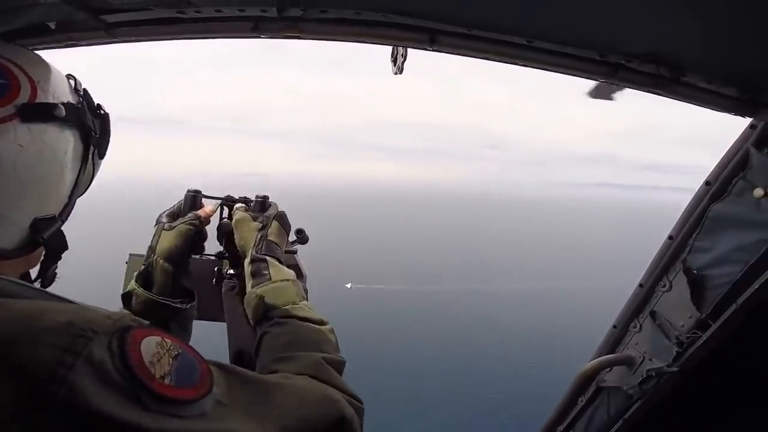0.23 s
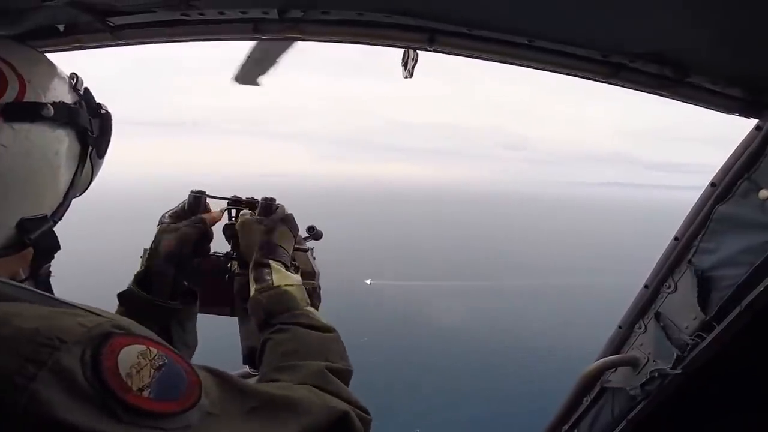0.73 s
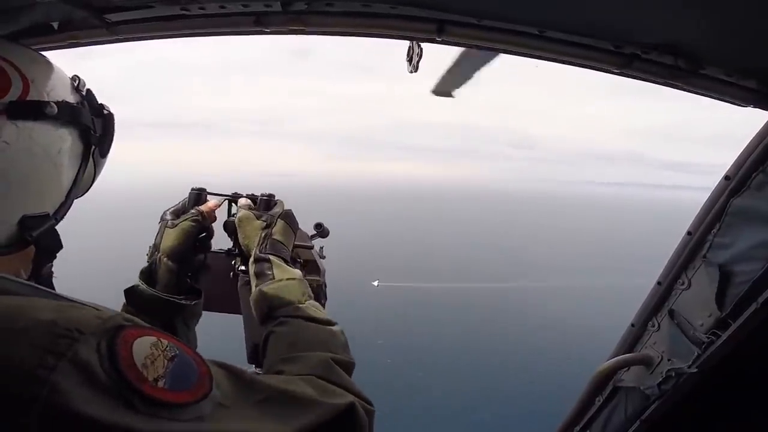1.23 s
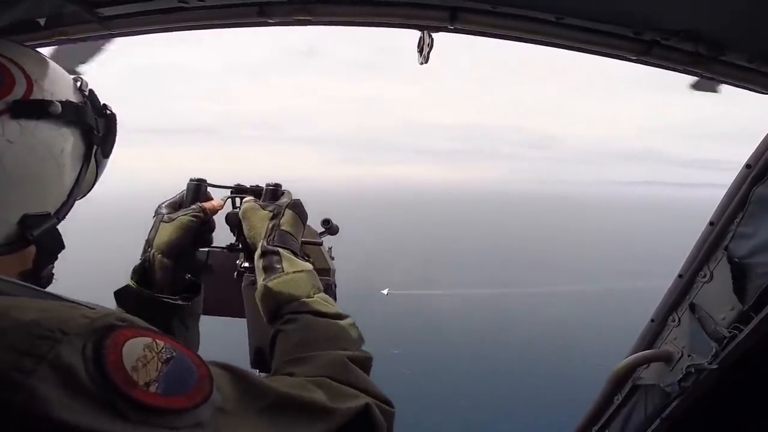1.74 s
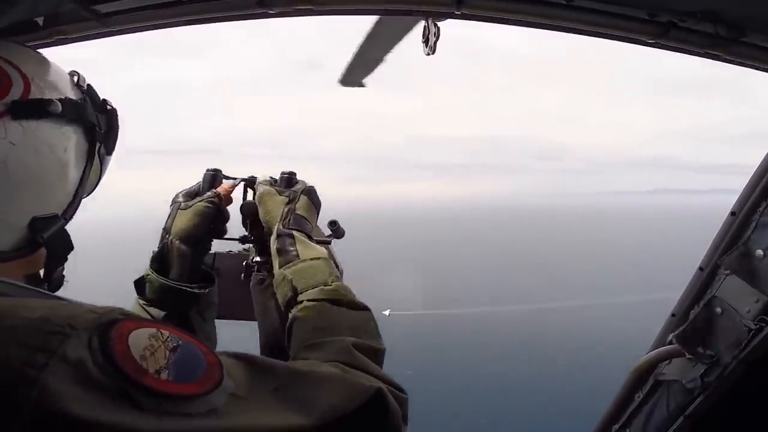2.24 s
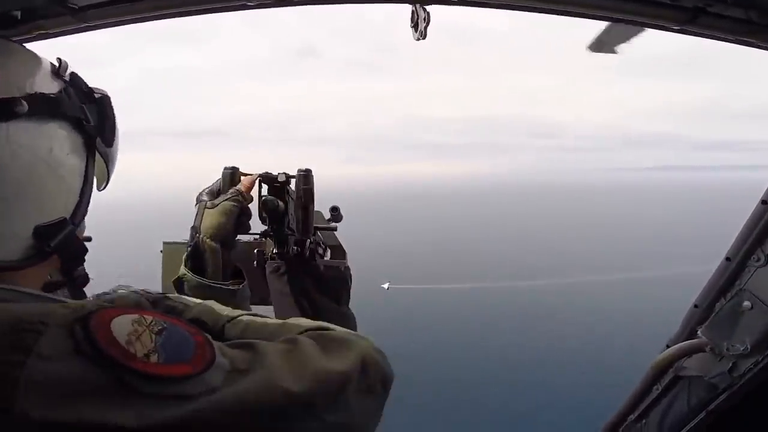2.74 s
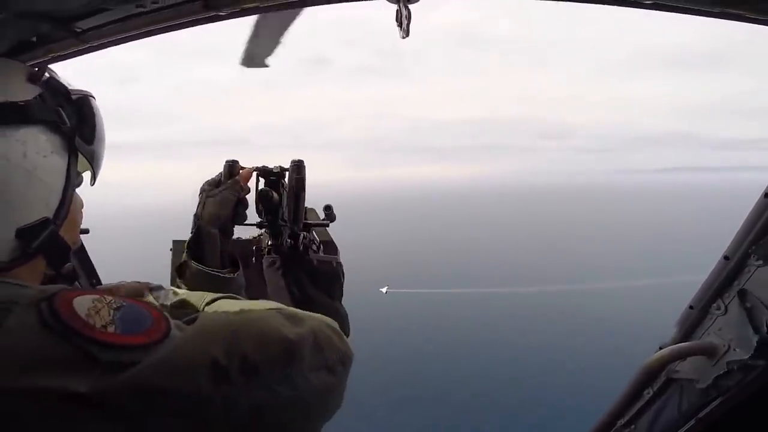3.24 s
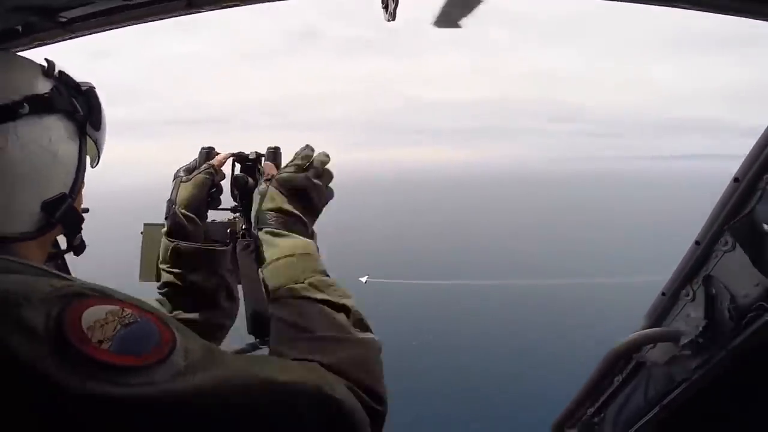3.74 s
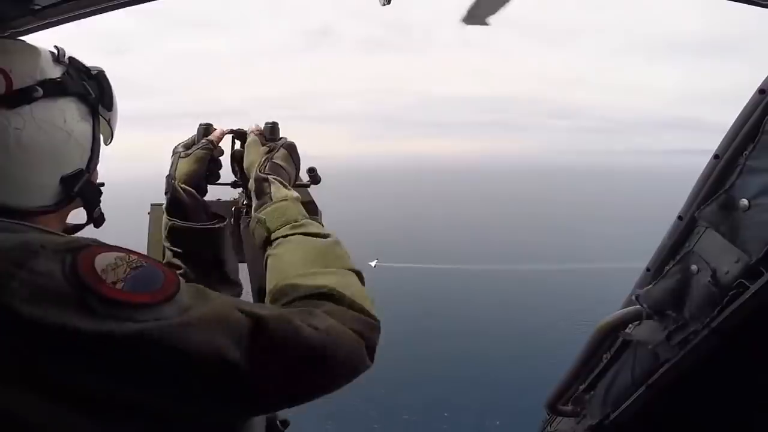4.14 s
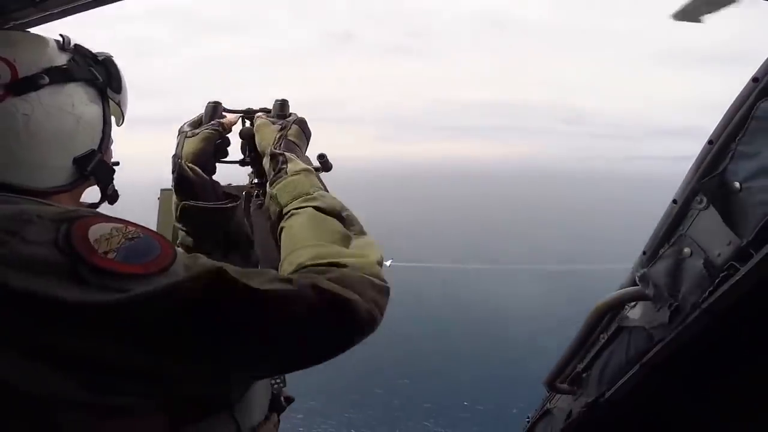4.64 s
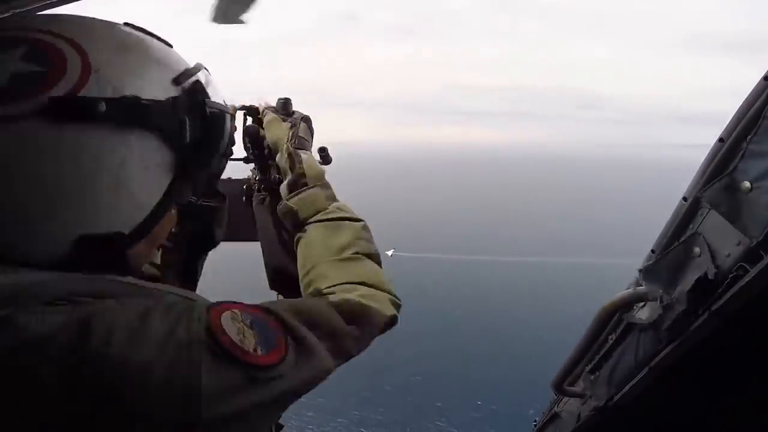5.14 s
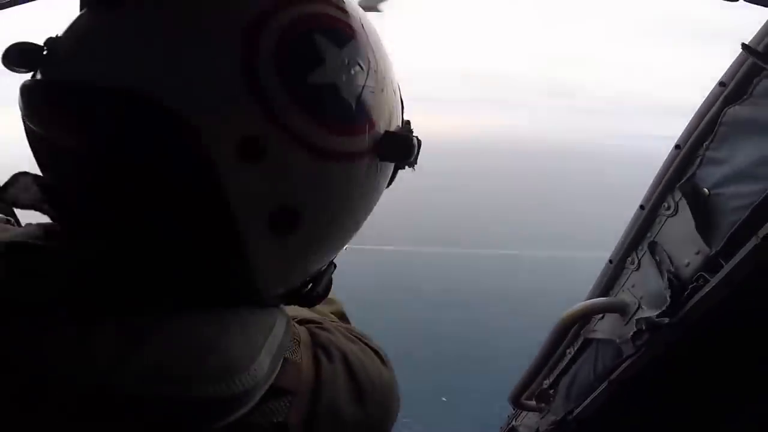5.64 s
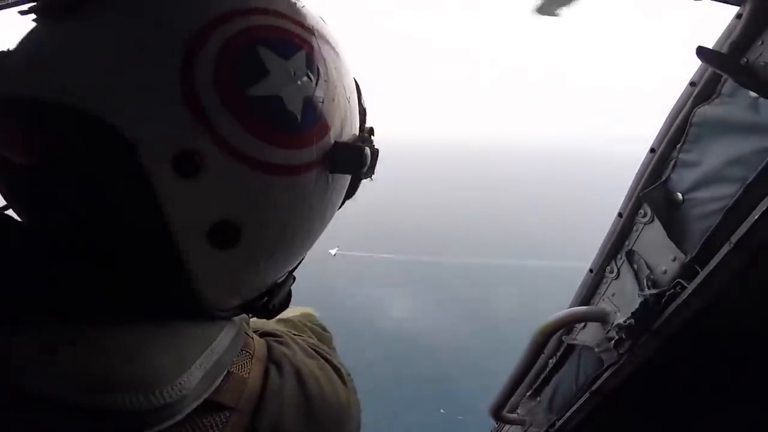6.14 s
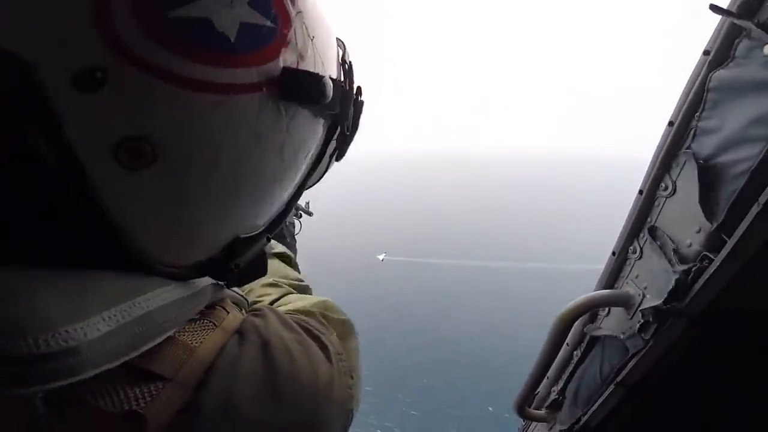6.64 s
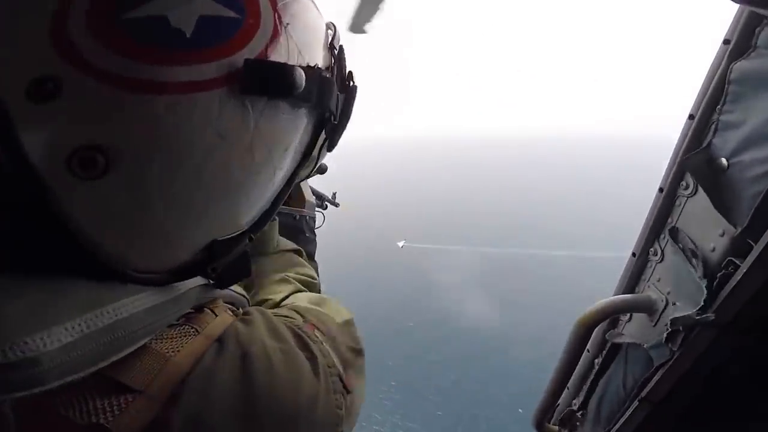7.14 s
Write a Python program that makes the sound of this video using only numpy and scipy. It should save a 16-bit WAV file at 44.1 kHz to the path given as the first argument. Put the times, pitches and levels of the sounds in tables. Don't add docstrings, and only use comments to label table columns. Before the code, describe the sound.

Inside a flying helicopter with its door open, a small camera sits right next to a mounted machine gun. At first only a quiet bed is heard: a steady gear whine near 1 kHz with a higher partner an octave up, wind hiss fluttering with the rotor, low drumming and a very high faint whistle. From 0.5 to 1.2 s ten shots hammer out, dry, boxy and distorted, about thirteen a second; another ten run from 1.7 to 2.4 s. Each shot pushes the background almost to nothing. From 2.5 to 4.6 s the gun rests and whine and wind swell gradually, the pitch rising slightly. Three quick shots come at 4.7 s, then another swelling pause. Five shots follow at 6.1-6.4 s, and a last burst of eight from 6.8 s runs to the end. Tails are very short; a small bolt clack precedes each burst.

```python
import sys
import numpy as np
from scipy import signal
from scipy.fft import rfft, irfft
from scipy.io import wavfile
from scipy.ndimage import uniform_filter1d, map_coordinates

SR = 44100
rng = np.random.default_rng(int(sys.argv[2]) if len(sys.argv) > 2 else 0)


def persist_wave(psi):
    counts = np.round(np.clip(psi, -1, 1) * 32767).astype(np.int16)
    wavfile.write(sys.argv[1], SR, np.atleast_2d(counts).T)


def decibels_to_gain(level_db):
    exponent = np.asarray(level_db, float) / 20
    return 10 ** exponent


N = 325437
TIME = np.arange(N) / SR
FULL_HZ = 1003


def unit(x):
    return x / np.sqrt(np.mean(x ** 2) + 1e-20)


def along(points, hz):
    f, v = np.transpose(points)
    return np.interp(np.log(hz + 1), np.log(f + 1), v)


def wobble(rate):
    return map_coordinates(rng.standard_normal(int(N * rate / SR) + 4), [TIME * rate])


def tone(hz):
    return np.sqrt(2) * np.sin(2 * np.pi * (np.cumsum(hz) / SR + rng.random()))


def noise(gain, patchy_db):
    z = signal.stft(rng.standard_normal(N + 8192), nperseg=512)[2]
    field = uniform_filter1d(rng.standard_normal(z.shape), 6, axis=0)
    field = uniform_filter1d(field, 10, axis=1)
    x = signal.istft(z * decibels_to_gain(patchy_db * unit(field)), nperseg=512)[1]
    spectrum = rfft(x) * gain(np.fft.rfftfreq(len(x), 1 / SR))
    return unit(irfft(spectrum, len(x))[:N])


def thin(x):
    return signal.sosfilt(signal.butter(2, 700, "highpass", fs=SR, output="sos"), x)


# (time of each shot [s], ..)
BURSTS = [
    [0.524, 0.608, 0.686, 0.76, 0.833, 0.903, 0.977, 1.051, 1.124, 1.2],
    [1.685, 1.771, 1.847, 1.924, 1.996, 2.071, 2.149, 2.224, 2.298, 2.375],
    [4.658, 4.74, 4.819],
    [6.107, 6.188, 6.263, 6.342, 6.419],
    [6.826, 6.905, 6.979, 7.052, 7.123, 7.196, 7.266, 7.337],
]


def gain_db(t):
    earlier_shot_s, hold_s, let_go_s, creep_s = -.05, .067, .043, 1.196
    ducked_db, let_go_db, creep_db = -59, 5, 21.5
    slams = np.r_[earlier_shot_s, np.concatenate(BURSTS) - .004]
    last_slam = slams[np.searchsorted(slams, t) - 1]
    free_s = np.maximum(t - last_slam - hold_s, 0)
    let_go = np.clip(free_s / let_go_s, 0, 1)
    creep = np.tanh(free_s / creep_s)
    return ducked_db + let_go_db * let_go + creep_db * creep, let_go


# (time [s], frequency [Hz])
MESH = [(0, 993), (.5, 995), (1.3, 990), (2.45, 989), (2.8, 987.5), (3.15, 989), (3.4, 994), (3.65, 1000.5),
        (3.9, 1000.5), (4.2, 1003), (4.65, 1003.5), (5.5, 1002), (6.1, 1000), (6.8, 998), (7.38, 997)]


def shaft_speed():
    return np.interp(TIME, *np.transpose(MESH)) / FULL_HZ


# (frequency [Hz], spectral density [dB per Hz])
RUMBLE = [(8.8, -30.5), (15, 8), (118, -0.5), (227, 5.5), (302, -2), (348, -6.5), (450, -10), (580, -4.5),
          (990, -120)]
# (frequency [Hz], width [Hz], level [dB])
DRUM = [(21.2, 13, -4), (77.6, 9.6, -2), (159.8, 12, -6.5), (195.6, 9.3, -7.5), (241.5, 11.4, -6)]


def cabin_rumble(air_db, let_go, speed):
    patchy_db = 1.2

    def modes(f):
        return np.abs(sum(decibels_to_gain(db) * (f * w / (c * c - f * f + 1j * f * w)) ** 2 for c, w, db in DRUM))

    rumble = decibels_to_gain(-1 + .2 * wobble(2.6)) * noise(lambda hz: decibels_to_gain(along(RUMBLE, hz)), patchy_db)
    drum = noise(modes, patchy_db)
    droop_hz = FULL_HZ * (1 - speed)
    rumble_db = 4 + .133 * droop_hz - .5 * (1 - let_go)
    return decibels_to_gain(air_db + rumble_db) * (rumble + drum)


# (frequency [Hz], spectral density [dB per Hz])
AIR = [(150, -13), (280, 1.5), (750, -2.5), (1450, 0.5), (1850, -2), (2600, -3.5), (3450, 0.5), (4050, -7),
       (4600, -10.5), (5300, -7), (6400, -7.5), (7600, -19), (10500, -21), (13500, -18), (15500, -25)]


def slipstream(air_db, speed):
    top_hz = 15050
    blades = tone(21.5 * speed)
    chopped = decibels_to_gain(8.5 + .7 * blades + 1.26 * wobble(30))
    return decibels_to_gain(air_db) * chopped * noise(lambda hz: decibels_to_gain(along(AIR, hz)) * (hz < top_hz), patchy_db=.47)


# (time [s], frequency [Hz])
WHISTLE = [(0, 13310), (.5, 13135), (1.1, 13050), (1.66, 13140), (2.45, 13260), (3.07, 13480), (3.4, 13610),
           (4.1, 13650), (4.64, 13590), (5.5, 13510), (6.1, 13455), (7.38, 13300)]


def compressor_whistle(air_db):
    hz = np.interp(TIME, *np.transpose(WHISTLE)) + 20 * wobble(90)
    return decibels_to_gain(air_db) * decibels_to_gain(-12.5 + 5 * wobble(30)) * tone(hz)


def gears(family, speed):
    wander = .0004
    return sum(decibels_to_gain(db + shake_db * wobble(30)) * tone(hz * (speed + wander * wobble(8)))
               for hz, db, shake_db in family)


# (frequency [Hz], level [dB], unsteadiness [dB])
MAIN_GEAR = [(982, -17, 3), (1003, 0, .8), (1024, -25, 3)]
# (frequency [Hz], level [dB], unsteadiness [dB])
SECOND_GEAR = [(1975, -10, 3.5), (1990, -15, 3.5), (2007, -11, 3), (2040, -1.5, 2), (2062, -13, 3)]
# (frequency [Hz], level over slipstream [dB], unsteadiness [dB])
OTHER_GEARS = [(353, -2, 2.5), (883, -16, 3), (1124, -11, 3), (1397, -13, 3), (1529, -14, 3),
               (2799, -17, 3), (2988, -4, 4), (3488, -12, 3), (3951, -14, 3), (4016, -15, 4), (4082, -9, 4),
               (7068, -26, 3)]
# (time [s], main gear over slipstream [dB], second gear over slipstream
# [dB])
GEAR_LOUDNESS = [(0, 9.5, 7.5), (1.4, 9, 4.5), (2.6, 11, 5), (3.17, 14.5, 0.5), (3.4, 15.5, 5), (4.5, 13, 4.5),
                 (5.6, 13, 5), (6.05, 10, 4), (6.55, 7.5, 2.5), (6.8, 3, 2)]


def gearbox(air_db, speed):
    s, main_db, second_db = np.transpose(GEAR_LOUDNESS)
    main = decibels_to_gain(air_db + np.interp(TIME, s, main_db)) * gears(MAIN_GEAR, speed)
    second = decibels_to_gain(air_db + np.interp(TIME, s, second_db)) * gears(SECOND_GEAR, speed)
    return main + second + decibels_to_gain(air_db) * gears(OTHER_GEARS, speed)


def helicopter():
    air_db, let_go = gain_db(TIME)
    air_db = uniform_filter1d(air_db, size=40)
    speed = shaft_speed()
    low = cabin_rumble(air_db, let_go, speed)
    return low + slipstream(air_db, speed) + compressor_whistle(air_db) + gearbox(air_db, speed)


# (frequency [Hz], spectral density [dB per Hz])
CABIN = [(59, 20), (100, 28), (350, 15), (836, -19.5), (1450, 1.5), (2800, -10), (3470, 2), (4200, -6.5),
         (6560, -12), (12900, -28.5), (16000, -33)]
# (frequency [Hz], time to fall by 60 dB [s])
CABIN_T60 = [(200, 0.034), (1400, 0.1), (3500, 0.1), (9000, 0.097)]


def reverb(seconds):
    hz, t, z = signal.stft(rng.standard_normal(round(seconds * SR)), SR, nperseg=128)
    size = unit(np.abs(z) * decibels_to_gain(along(CABIN, hz))[:, None])
    decay = decibels_to_gain(-60 * t / along(CABIN_T60, hz)[:, None])
    return signal.istft(size * np.exp(1j * np.angle(z)) * decay, SR, nperseg=128)[1] / 8


def bolt(burst):
    s = burst[0] - .009
    slam = round(.006 * SR)
    db = gain_db(s)[0] + 20 - 9
    return round(s * SR), decibels_to_gain(db) * unit(thin(reverb(.02))[200:200 + slam])


TICK_DB = [-28, -33, -33, -32]


def mount_tick(stance, db, first):
    lead = round(.0034 * SR)
    rise = np.clip(np.arange(lead) / SR * 1200, 0, 1)
    tick = unit(thin(reverb(.02))[200:200 + lead])
    return decibels_to_gain(db + TICK_DB[stance] + 5 * first) * tick * rise


def ring(modes, t, scatter_db, drift):
    hz, width, db = np.transpose(modes)[:, :, None]
    luck = rng.standard_normal((2,) + hz.shape)
    size = width * decibels_to_gain(db + scatter_db * luck[0])
    swing = np.cos(2 * np.pi * hz * (1 + drift * luck[1]) * t)
    return -np.sum(size * np.exp(-np.pi * width * t) * swing, axis=0) / np.sum(width * decibels_to_gain(db))


# (frequency [Hz], width [Hz], level [dB])
RING_FIRST = [(370, 550, -2), (815, 367, -5.5), (1296, 690, 6), (1696, 51, -0.5), (2227, 52, 1),
              (3130, 365, 7.5), (3390, 280, 6), (5080, 137, 0.5), (5530, 370, -8), (5680, 180, -5),
              (7900, 150, -24), (9150, 390, -22)]
RING_SECOND = [(380, 700, 0), (804, 400, -16.5), (1330, 180, 8), (1730, 71, 1), (2243, 200, 1.5),
               (2900, 310, -11), (3330, 246, 3), (4620, 1070, -4.5), (5650, 290, 0), (7200, 400, -58),
               (8900, 1500, -18)]
RING_THIRD = [(380, 380, -1), (804, 950, -7.5), (1360, 130, 3), (1780, 200, 6.5), (2230, 68, -1),
              (3090, 460, 2), (4840, 600, -2), (5830, 180, -1.5), (9400, 2500, -14.5)]
RING_LAST = [(400, 300, -1.5), (692, 49, -8.5), (1112, 120, 9), (1787, 83, 2.5), (2260, 200, -3.5),
             (3340, 620, -3), (3300, 580, -5), (5100, 310, -2), (5580, 230, -22), (5700, 290, 1),
             (7260, 180, -47), (8600, 650, -12.5)]
# (delay [s], level [dB])
ECHOES = [(0, 0), (.0004, -2), (.0015, -12), (.003, -9), (.0053, -14)]


def blast(stance, t, walls, cabin):
    most, some = .85, .5
    gas = decibels_to_gain(-22 - 60 * t / .016)
    blows = gas * thin(some * walls + most * rng.standard_normal(len(t)))
    for lag, echo_db in ECHOES:
        luck = rng.standard_normal(size=2)
        blows[round(lag * (1 + .015 * luck[0]) * SR)] += decibels_to_gain(echo_db + .5 * luck[1])
    modes = (RING_FIRST, RING_SECOND, RING_THIRD, RING_LAST)[stance]
    body = ring(modes, t, scatter_db=.8, drift=.005)
    capsule = signal.butter(2, [110, 8000], "bandpass", fs=SR, output="sos")
    direct = decibels_to_gain(13.5) * signal.sosfilt(capsule, signal.fftconvolve(blows, body)[:len(t)])
    direct = direct / (1 + np.abs(direct) ** 3) ** (1 / 3)
    rise = np.clip(t * 250, 0, 1)
    tail = decibels_to_gain(-13) * rise * thin(some * cabin + most * reverb(len(t) / SR)[:len(t)])
    smooth = signal.butter(2, [140, 11000], "bandpass", fs=SR, output="sos")
    return signal.sosfilt(smooth, direct + tail)


STANCE_FROM = [
    0,
    4,
    5.5,
    6.6,
]


def gun():
    shot_db, first_shot_db = [-3.5, -3, -3, -4.5], 2.5
    out, t = np.zeros(N + SR), np.arange(SR // 16) / SR
    walls = rng.standard_normal((len(STANCE_FROM), len(t)))
    cabin = [reverb(len(t) / SR)[:len(t)] for _ in STANCE_FROM]
    for burst in BURSTS:
        start, slam = bolt(burst)
        out[start:][:len(slam)] += slam
        for s in burst:
            first = s == burst[0]
            stance = np.searchsorted(STANCE_FROM, s) - 1
            db = shot_db[stance] + first_shot_db * first
            start = round((s + .001) * SR)
            out[start:][:len(t)] += decibels_to_gain(db + .5) * blast(stance, t, walls[stance], cabin[stance])
            tick = mount_tick(stance, db, first)
            out[start - len(tick):start] += tick
    out = out[:N]
    muffled = signal.lfilter(*signal.iirpeak(4350, 5, SR), out)
    return out - .45 * muffled


def scene():
    return (gun() + helicopter())[None]


# (frequency [Hz], level in a bin [dB])
TREBLE_LIMIT = [(7000, -130), (9000, -104), (13500, -96), (13800, -84), (14300, -79), (15000, -73), (15200, -85)]


def drop_faint_treble(x):
    def spread(field, bins, frames):
        return uniform_filter1d(uniform_filter1d(field, size=bins, axis=1), size=frames, axis=2)

    hz, _, z = signal.stft(x, SR, nperseg=1024)
    near = spread(np.abs(z) ** 2, 14, 4)
    near = near * decibels_to_gain(6 * unit(spread(rng.standard_normal(z.shape), 14, 2)))
    faint = near < decibels_to_gain(2 * along(TREBLE_LIMIT, hz))[:, None]
    return signal.istft(z * ~faint, SR, nperseg=1024)[1][:, :N]


def roll_off(x):
    return signal.sosfilt(signal.butter(12, 16450, fs=SR, output="sos"), x)


def record(dry):
    ceiling = .62
    dry = dry / (1 + np.abs(dry / ceiling) ** 6) ** (1 / 6)
    kept = drop_faint_treble(dry)
    band = signal.sosfilt(signal.cheby2(8, 22, 15600, fs=SR, output="sos"), kept)
    return roll_off(band)


dry = scene()
out = record(dry)
persist_wave(out)
```